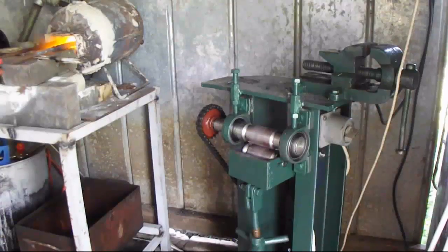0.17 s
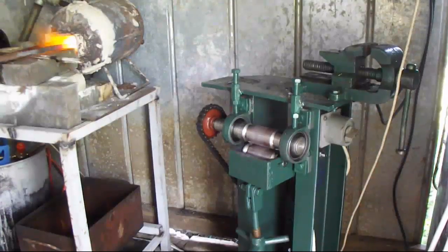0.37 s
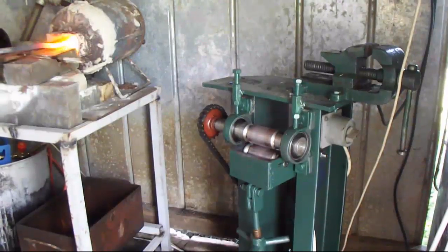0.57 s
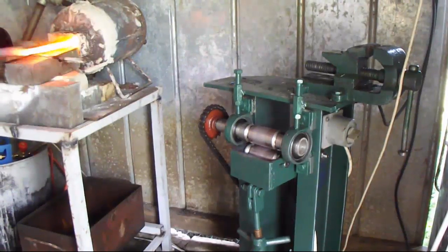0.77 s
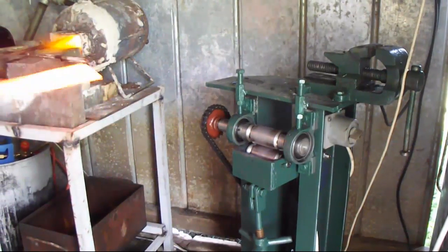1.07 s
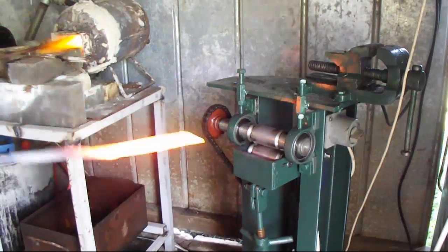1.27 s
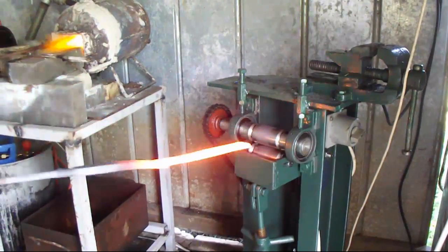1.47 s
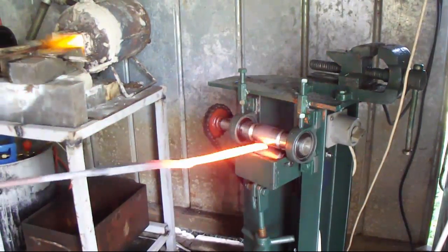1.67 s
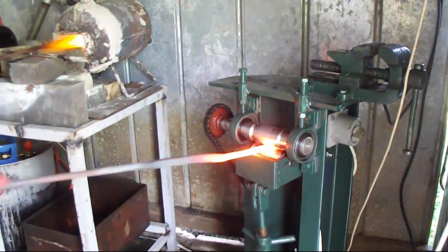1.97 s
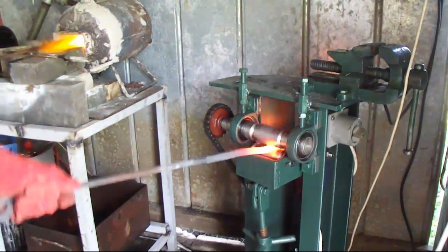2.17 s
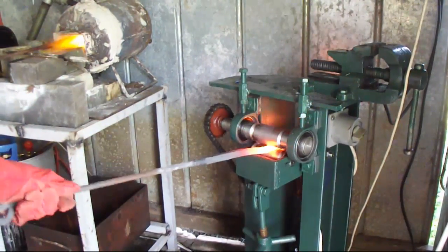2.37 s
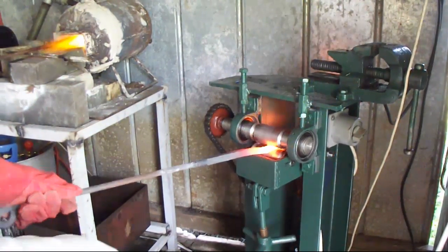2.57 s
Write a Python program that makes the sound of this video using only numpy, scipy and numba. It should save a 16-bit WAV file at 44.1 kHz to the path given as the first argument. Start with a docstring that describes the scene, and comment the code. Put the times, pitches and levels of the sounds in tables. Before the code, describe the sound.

Low, fluttering roar of a burning gas forge, with air hissing through its burner.

```python
"""A low roar and a hiss: a gas forge is burning in a small sheet-metal workshop.
The flame rumbles and puffs, booming in the chamber and the room, while gas and air hiss through the
burner tube and whistle briefly. A rolling mill clinks once and a motor whines faintly.
Hard puffs trip a limiter, which turns everything down with a tiny click and lets it creep back up."""
import sys
import numpy as np
from scipy.fft import rfft, irfft, next_fast_len
from scipy.io import wavfile
from scipy.ndimage import map_coordinates
from numba import njit

SR = 44100
rng = np.random.default_rng(int(sys.argv[2]) if len(sys.argv) > 2 else 0)


def wrap_up_sound(samples):
    """Save the sound to the file named by the first command line argument, as 16-bit audio."""
    columns = np.atleast_2d(samples).T
    # keep every value between -1 and 1, then stretch to whole-number steps
    tamed = np.clip(columns, -1, 1)
    steps = np.round(tamed * 32767).astype(np.int16)
    wavfile.write(sys.argv[1], SR, steps)


N = 119511


def flame(flutter_db):
    """Burning gas makes a low noise that booms in the chamber and the room."""
    # how strong the rumble is from low to high: f/Hz, relative level/dB
    spectrum = [(20, -46), (55, -25), (80, -19), (120, -9), (170, -6.5), (260, -6.5), (370, -6), (470, -12),
                (600, -18.5), (900, -30.5), (2000, -59)]
    # notes at which chamber and room ring: f/Hz, width/Hz, boost/dB
    resonances = [(119, 8, 5), (135.7, 7, 2), (166, 15, 10), (196.65, 11.1, 12), (234.7, 8.2, 8),
                  (255.6, 13, 6.5), (269, 5.9, 5.5), (293.9, 9, 15), (320.3, 16.7, 10), (358.6, 11, 11),
                  (376.4, 9, 13), (385.7, 6, 5.5), (431, 13.8, 10.5), (513.5, 22, 7.5), (535.6, 23, 5.5)]
    # how the rumble rises and falls: t/s, relative level/dB
    loudness = [(.08, -13), (.3, -12), (.44, -13), (.5, -17), (.62, -15), (.78, -10.5), (.95, -15),
                (1.03, -12.5), (1.16, -12), (1.33, -12.5), (1.5, -14.5), (1.7, -15.5), (1.85, -18),
                (2.0, -11), (2.17, -14), (2.25, -14.5), (2.5, -10.5), (2.7, -11.5)]
    rumble = unit(turbulence(spectrum, resonances) * amp(flutter_db))
    return rumble * amp(curve(loudness) + .05)


def jet(flutter_db):
    """Gas and blown air hiss as they rush through the burner tube."""
    # how strong the hiss is from low to high: f/Hz, relative level/dB
    spectrum = [(200, -2.5), (500, 7), (750, 5.5), (1100, 2), (1400, 0.5), (1650, -1.5), (2050, -1.5),
                (2500, -3.5), (2900, 0.5), (3550, 0.5), (3850, -3), (4150, -9), (5000, -20), (5900, -30),
                (6700, -24.5), (7500, -18), (8300, -16), (9200, -22.5), (10500, -26.5), (12200, -34),
                (13300, -34), (14400, -43), (15800, -46)]
    # notes at which the tube rings: f/Hz, width/Hz, boost/dB
    resonances = [(608, 8.8, 2), (700, 23, 2.5), (772, 7.6, 3.5), (957.6, 19.7, 11), (1078, 14, -1),
                  (1392, 32, 7), (1757, 61, 7), (2180, 50, 2.5), (2896, 100, 1), (3250, 30, 3)]
    # how the hiss rises and falls, before its swings are softened: t/s, relative level/dB
    loudness = [(.08, -24.5), (.2, -27.5), (.28, -22.5), (.35, -22.5), (.42, -25), (.46, -28.5),
                (.58, -28.5), (.67, -23), (.70, -26.5), (.77, -19.5), (.81, -21.5), (.85, -27.5),
                (1.0, -26), (1.04, -29.5), (1.16, -20.5), (1.21, -29), (1.34, -21.5), (1.42, -28.5),
                (1.55, -32), (1.66, -25.5), (1.76, -29.5), (1.88, -23.5), (1.93, -26.5), (1.99, -22.5),
                (2.1, -27.5), (2.18, -23), (2.22, -29.5), (2.3, -26.5), (2.42, -28), (2.5, -24),
                (2.58, -23.5), (2.63, -27), (2.7, -22)]
    hiss = unit(turbulence(spectrum, resonances) * amp(flutter_db))
    db = curve(loudness)
    softened_db = db.mean() + .83 * (db - db.mean())
    return hiss * amp(softened_db + 3)


def puffs(roar, hz=294, width_s=.0021, trim_db=-3):
    """Each puff of the flame is a low thump that pushes the air the way the roar already does."""
    # hard puffs: t/s, peak level before the trim/dB
    thumps = [(.177, -3), (.312, -3.5), (.354, -6), (.430, -5), (.443, -1.5), (0.532, -1), (.596, -4),
              (.672, -6), (.781, -0.5), (0.82, -2.5), (.888, -13), (0.925, -1.5), (1.021, -2), (1.171, 0),
              (1.407, -2), (1.484, 1.5), (1.681, -3), (1.743, -1), (1.890, -18), (1.999, 1), (2.080, -6),
              (2.188, -2), (2.303, 2.5), (2.507, 0), (2.598, -6)]
    t = np.arange(N) / SR
    out = np.zeros(N)
    for s, db in thumps:
        direction = np.sign(np.interp(s, t, roar))
        envelope = amp(db + trim_db) * np.exp(-((t - s) / width_s) ** 2)
        out += direction * envelope * np.cos(2 * np.pi * hz * (t - s))
    return out


def whistle():
    """The jet gives a thin, wavering whistle whose pitch sags and rises again."""
    # path of the whistle: t/s, f/Hz, average level/dB
    path = [(1.23, 3365, -58), (1.27, 3360, -32), (1.40, 3390, -45), (1.50, 3375, -39), (1.56, 3200, -34),
            (1.609, 2987, -42), (1.68, 3410, -34), (1.73, 3456, -60)]
    s, hz, db = np.transpose(path)
    t = np.arange(N) / SR
    pitch = np.interp(t, s, hz) + 40 * wobble(200)
    level_db = np.interp(t, s, db, left=-120, right=-120) + 2 * wobble(40)
    return tone(pitch, level_db)


def mill(crack_db=-10, crack_fade_s=.003):
    """Metal knocks in the rolling mill: a tiny crack of contact and a ring that dies quickly."""
    # the clink: t/s, ring's peak level/dB, f/Hz, time to fade by 60 dB/s
    clinks = [(0.4618, -16, 3350, 0.015)]
    out = np.zeros(N)
    for s, db, hz, fade_s in clinks:
        age = np.maximum(np.arange(N) / SR - s, 0)
        crack = (age > 0) * amp(crack_db - 60 * age / crack_fade_s) * rng.standard_normal(N)
        ring = amp(-60 * age / fade_s) * np.sin(2 * np.pi * hz * age)
        out += amp(db) * (ring + crack)
    return out


def motor(drift_hz=1.74):
    """A motor whines on two faint, slightly unsteady notes."""
    # notes of the whine: f/Hz, average level/dB
    notes = [(1590, -47.5), (1791, -48)]
    return sum(tone(hz + drift_hz * wobble(12), db) for hz, db in notes)


def turbulence(spectrum, resonances):
    """Swirling gas makes a broad noise; the space around it boosts the notes at which it rings."""
    def response(f):
        points, db = np.transpose(spectrum)
        broad = amp(np.interp(np.log(f + 1), np.log(points), db))
        peaks = sum((amp(boost) ** 2 - 1) / (1 + (2 * (f - hz) / width) ** 2) ** 2
                    for hz, width, boost in resonances)
        return broad * np.sqrt(np.abs(1 + peaks))
    return unit(filtered(rng.standard_normal(N), response))


def tone(hz, db):
    """A pure tone that follows a changing pitch, at an average (rms) level of db."""
    return amp(db) * np.sqrt(2) * np.sin(2 * np.pi * np.cumsum(hz) / SR)


def amp(db):
    """Turn decibels into a number to multiply by."""
    return 10 ** (np.asarray(db) / 20)


def unit(x):
    """Scale a sound to an average (rms) strength of 1."""
    return x / np.sqrt(np.mean(x ** 2) + 1e-20)


def curve(rows):
    """Join (time, value) points with straight lines, one value per sample."""
    return np.interp(np.arange(N) / SR, *np.transpose(rows))


def wobble(rate):
    """A smooth curve through random points, rate of them a second."""
    points = rng.standard_normal(int(N * rate / SR) + 4)
    return map_coordinates(points, [np.arange(N) * rate / SR])


def filtered(x, response):
    """Multiply each frequency f in the sound by response(f)."""
    size = next_fast_len(N + SR // 2)
    return irfft(rfft(x, size) * response(np.fft.rfftfreq(size, 1 / SR)), size)[:N]


@njit
def limiter(x, limit, duck, recover, glide):
    """When the sound passes the limit, the volume drops within a few samples, then climbs back."""
    out, goal, gain = np.zeros(len(x)), 1.0, 1.0
    for i in range(len(x)):
        if abs(x[i]) * goal > limit:
            goal *= duck
        gain += glide * (goal - gain)
        out[i] = x[i] * gain
        goal = min(1.0, goal * recover)
    return out


def scene():
    """Add up the workshop: flame and jet flutter together, and the flame also heaves more slowly."""
    flutter = wobble(45)
    heave_db = 1.5 * wobble(14)
    roar = flame(.5 * flutter + heave_db) + jet(.68 * flutter)
    return (roar + puffs(roar) + whistle() + motor() + mill())[None]


def record(dry):
    """After a moment of silence the sound comes in, its peaks limited and its highest treble cut."""
    start_s, top_hz = .069, 15850
    limit, duck_db, attack_s, recover_db_per_s = .76, 2.0, .000018, 100
    switched_on = np.arange(N) / SR >= start_s
    glide = 1 - np.exp(-1 / (attack_s * SR))
    limited = limiter(dry[0] * switched_on, limit, amp(-duck_db), amp(recover_db_per_s / SR), glide)
    return filtered(limited, lambda hz: hz < top_hz)[None]


dry = scene()
out = record(dry)
wrap_up_sound(out)
```